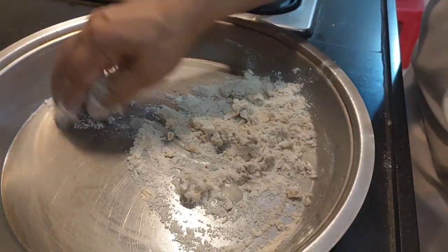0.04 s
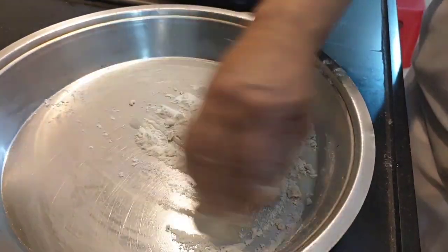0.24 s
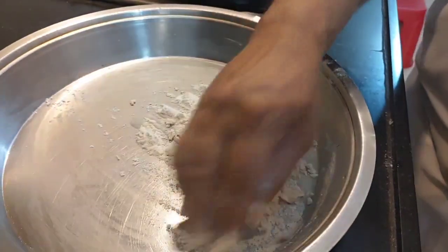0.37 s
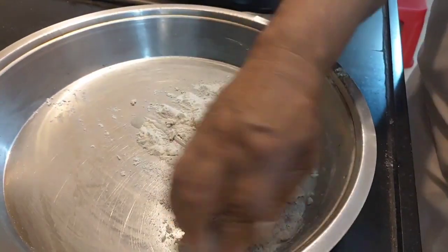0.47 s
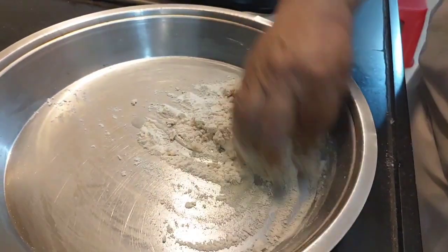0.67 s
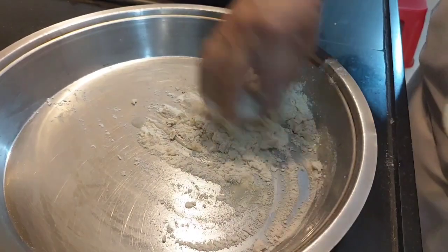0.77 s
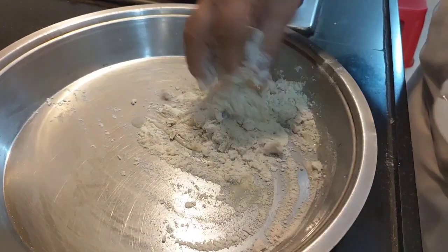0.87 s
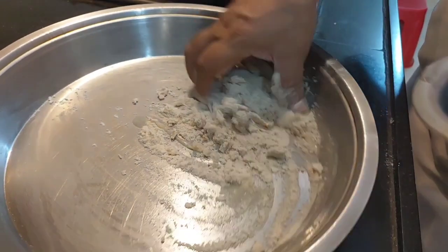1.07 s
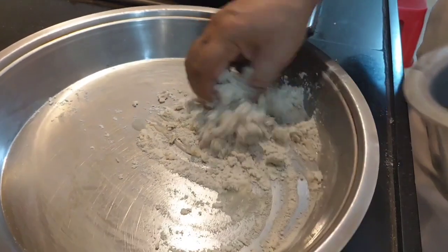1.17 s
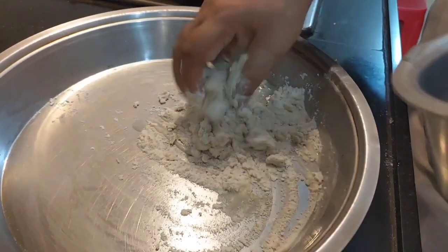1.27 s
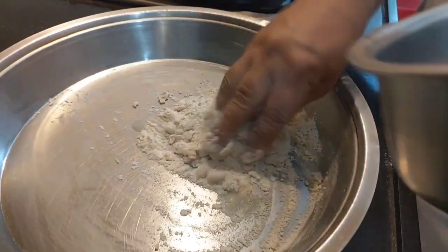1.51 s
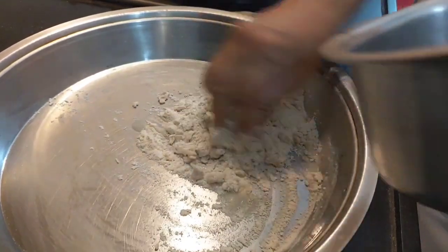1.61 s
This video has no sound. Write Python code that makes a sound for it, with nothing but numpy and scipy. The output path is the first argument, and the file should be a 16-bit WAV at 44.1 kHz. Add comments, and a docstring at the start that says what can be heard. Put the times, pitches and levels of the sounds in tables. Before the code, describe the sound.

Fingers scrape and rub damp flour around a steel plate, ending with a dull clonk.

```python
"""Working flour on a steel plate

Fingers push damp flour around a stainless steel plate: two scratchy sweeps and a lighter third.
Tiny slips of grit make the steel sing faintly, and the palm thuds through the dough.
Near the end the plate rocks with a dull clonk and settles. A small kitchen echoes over a low hum."""
import sys
import numpy as np
from scipy import signal
from scipy.fft import rfft, irfft, next_fast_len
from scipy.io import wavfile
from scipy.ndimage import map_coordinates

SR = 44100
rng = np.random.default_rng(int(sys.argv[2]) if len(sys.argv) > 2 else 0)


def transcribe(signal):
    """Save signal, clipped to [-1, 1], as a 16-bit WAV file at the path in sys.argv[1]."""
    frames = np.atleast_2d(signal).T
    limited = np.clip(frames, -1, 1)
    pcm = np.round(limited * 32767).astype(np.int16)
    wavfile.write(sys.argv[1], SR, pcm)


N = 72765  # 1.65 s

# Tone of the kitchen's steady noise: f/Hz, relative level/dB
ROOM_TONE = [(25, -5.5), (45, -14), (90, 4), (160, 3), (260, -7.5), (400, -23), (600, -22), (1150, -28),
             (1700, -30), (4000, -37.5), (7600, -37), (8400, -52.5)]
# Notes of the hum: f/Hz, level/dB
HUM_NOTES = [(100, -74), (148, -73), (247, -81)]
# The kitchen's echo: f/Hz, fade time/s (the time to drop by 60 dB)
ECHO_FADES = [(150, 0.22), (800, 0.38), (1500, 0.39), (3000, 0.31), (8000, 0.24)]
# The palm presses the dough: t/s, length/s, thud level/dB, plate drone level/dB
PALM_PRESSES = [(-.02, 0.029, -57.5, -81), (.05, 0.044, -63.5, -58), (0.173, 0.11, -55, -70.5),
                (0.288, 0.059, -50.5, -71.5), (0.392, 0.14, -56.5, -88.5), (0.603, 0.071, -61, -53.5),
                (0.702, 0.076, -54.5, -59.5), (0.803, 0.029, -57, -57.5), (0.979, 0.11, -56.5, -64),
                (1.101, 0.11, -56.5, -52.5), (1.209, 0.1, -58.5, -58), (1.339, 0.091, -50, -62),
                (1.431, 0.068, -59.5, -57), (1.616, .04, -59, -76)]
# Tone of a thud: f/Hz, relative level/dB
THUD_TONE = [(40, -17.5), (70, -14), (95, -2), (120, -7.5), (146, 1), (185, -3), (250, -2.5), (310, -12),
             (400, -18.5), (600, -47)]
# The plate sounds briefly as the hand presses it, and at the end as it settles on the counter:
# t/s, length/s, level/dB, f/Hz
PLATE_MURMURS = [(-.02, 0.032, -74, 770), (.0, 0.21, -86, 1180), (0.167, 0.057, -64, 1220),
                 (0.216, 0.029, -52.5, 1192), (0.247, 0.034, -59, 950), (0.29, 0.075, -52, 773),
                 (0.341, 0.03, -49.5, 772), (0.311, 0.042, -58, 360), (0.383, 0.15, -63, 827),
                 (0.662, 0.14, -65.5, 436), (0.794, 0.031, -68, 440), (0.946, 0.096, -77, 1097),
                 (0.957, 0.22, -68.5, 424), (1.262, 0.01, -63, 713), (1.256, 0.047, -66.5, 1340),
                 (1.359, 0.044, -56, 488), (1.369, 0.016, -54.5, 1240), (1.457, 0.0062, -70, 1780)]
# Low notes of the whole plate: f/Hz, relative level/dB, fade time/s
LOW_NOTES = [(190.3, -8.5, 0.33), (241.4, -1.5, 0.19), (423.5, 4, 0.16), (476, -8.5, 0.19),
             (752, 1.5, 0.12), (792, -0.5, 0.22), (1053, -15, 0.25), (1245, -7, 0.2), (1358, -17.5, 0.26),
             (1425, -14.5, .14), (1561, -17, 0.11), (1750, -13, 0.12), (1896, -22.5, .18),
             (2379, -25, 0.11)]
# The plate meets the counter: t/s, relative level/dB, rise time/s, centre f/Hz, spread/octaves
COUNTER_KNOCKS = [(1.3363, -38.5, 0.00047, 1835, 0.37), (1.336, -41.5, 0.0033, 226, 0.42),
                  (1.340, -35.5, 0.0079, 810, .4), (1.374, -41, .016, 485, 0.14)]
# Tone of flour grit scratching steel: f/Hz, relative level/dB
SCRATCH_TONE = [(2000, -42), (3300, -20.5), (3900, -4), (4400, -4.5), (5050, 3), (5750, -1.5), (6300, -5.5),
                (7000, -4.5), (7600, -1.5), (8000, -16.5), (8450, -30.5)]
# Duller tone of skin rubbing steel: f/Hz, relative level/dB
RUB_TONE = [(400, -29), (650, -14.5), (900, -13.5), (1150, 2), (1500, 2), (2150, 5.5), (2600, 2),
            (3200, -4.5), (4500, -18.5)]
# Bright notes of the plate, set off by the grit: f/Hz, relative level/dB, fade time/s
BRIGHT_NOTES = [(1120, -10, .25), (2104, -8, .25), (2907, 1, 0.49), (3760, -8, .45), (4090, -2, .5),
                (4737, -7.5, 0.24), (4880, -3.5, .36), (4953, -3.5, 0.13), (5060, -14.5, .33),
                (5020, -8, 0.11), (5395, -15.5, 0.17), (6730, -4, 0.46), (7340, -5, .33), (7530, -8, .35)]
# Finger strokes: t/s, length/s, scratch level/dB, rub level/dB, boost to the steel's ringing/dB
FINGER_STROKES = [(0.156, 0.038, -57, -68, 0), (0.207, .016, -51.5, -53, 13.5),
                  (0.222, 0.025, -41.5, -52, 3), (0.253, 0.075, -40, -53.5, -19.5),
                  (0.273, 0.01, -31, -49.5, -9), (0.299, 0.031, -29.5, -43.5, -8.5),
                  (0.332, 0.0025, -37, -41, 13.5), (0.343, 0.015, -29, -39.5, 3),
                  (0.365, 0.076, -49, -54, 11), (0.439, 0.037, -37, -51.5, -2.5),
                  (0.469, 0.02, -58, -50.5, 12), (0.511, 0.049, -67.5, -62, -5),
                  (0.565, 0.039, -64.5, -64, -6), (0.62, 0.072, -61.5, -63.5, 10),
                  (0.659, .01, -49.5, -55, 11), (0.669, 0.03, -42.5, -55, -1.5),
                  (0.704, 0.016, -44.5, -69.5, -4.5), (0.722, 0.058, -43, -55.5, -20.5),
                  (0.78, 0.012, -65, -58.5, -18), (0.814, 0.042, -50, -57, -0.5),
                  (0.869, 0.023, -66, -67.5, 1), (0.937, 0.052, -71, -79.5, 3.5),
                  (1.195, 0.048, -60, -74, 12.5), (1.225, 0.026, -48.5, -65, -9.5),
                  (1.248, 0.077, -53.5, -62.5, -8), (1.332, .04, -59.5, -62, -9),
                  (1.37, 0.013, -56.5, -67, -3)]


def amp(db):
    """Turns decibels into a gain."""
    return 10 ** (np.asarray(db) / 20)


def unit(x):
    """Scales a sound to an average power of 1."""
    return x / np.sqrt(np.mean(x ** 2) + 1e-20)


def along(points, hz):
    """Reads between the rows of a (frequency, value) table, evenly in pitch."""
    f, values = np.transpose(points)
    return np.interp(np.log(hz + 1), np.log(f + 1), values)


def filtered(x, gain_at):
    """Turns each frequency up or down by gain_at(hz)."""
    size = next_fast_len(N + SR // 2)
    return irfft(rfft(x, size) * gain_at(np.fft.rfftfreq(size, 1 / SR)), size)[:N]


def coloured(x, tone):
    """Shapes a sound with a tone table, at an average power of 1."""
    return unit(filtered(x, lambda hz: amp(along(tone, hz))))


def wobble(per_s):
    """A smooth curve through per_s random values a second."""
    return map_coordinates(rng.standard_normal(4096), [np.arange(N) * per_s / SR], mode="wrap")


def wavering(hz, t, radians, per_s):
    """A pure note that drifts a little ahead and behind."""
    return np.sin(2 * np.pi * hz * t + radians * wobble(per_s))


def envelope(starts, lengths, levels_db, attack_s, release_s):
    """Loudness over time: each move rises, holds and dies away; overlaps add in power."""
    t = np.arange(N) / SR - starts[:, None]
    since_end = np.maximum(t - lengths[:, None], 0)
    shape = np.clip(t / attack_s, 0, 1) * np.exp(-since_end / release_s)
    return np.sqrt(np.sum((amp(levels_db)[:, None] * shape) ** 2, axis=0))


def fade(t, fade_s):
    """Dies away by 60 dB every fade_s seconds."""
    return np.exp(-np.log(1000) * t / fade_s)


def background():
    """Low kitchen noise with a faint, slightly unsteady hum."""
    t = np.arange(N) / SR
    hum = sum(amp(db) * np.sqrt(2) * wavering(hz, t, radians=.5, per_s=5.6) for hz, db in HUM_NOTES)
    return hum + amp(-66) * coloured(rng.standard_normal(N), ROOM_TONE)


def kitchen_echo(x, level_db):
    """The room answers a sound; each frequency dies at its own speed."""
    hz, t, spectrum = signal.stft(rng.standard_normal(SR // 2), SR, nperseg=256)
    fading = fade(t, along(ECHO_FADES, hz)[:, None])
    _, tail = signal.istft(spectrum * fading, SR, nperseg=256)
    tail = np.pad(tail, (SR // 200, 0))  # arrives 5 ms late
    return amp(level_db) * signal.fftconvolve(x, tail / np.linalg.norm(tail))[:N]


def kneading():
    """The palm thuds through the dough and keeps the plate's lowest note droning."""
    start, length, thud_db, drone_db = np.transpose(PALM_PRESSES)
    level = lambda db: envelope(start, length, db, attack_s=.0089, release_s=.031)
    drone = unit(wavering(144, np.arange(N) / SR, radians=.92, per_s=20))
    thud = coloured(rng.standard_normal(N), THUD_TONE)
    return thud * level(thud_db) + drone * level(drone_db)


def murmuring():
    """The plate sounds briefly around one pitch when pressed, and at the end as it settles."""
    width_octaves = .19
    out = np.zeros(N)
    for start, length, db, hz in PLATE_MURMURS:
        peak = lambda f: 1 / (1 + (np.log2((f + 1) / hz) / width_octaves) ** 2) ** 2
        band = unit(filtered(rng.standard_normal(N), peak))
        out += band * envelope(np.array([start]), np.array([length]), [db], attack_s=.011, release_s=.014)
    return out


def rocking():
    """The plate tips against the counter and settles; each knock rings some of its low notes."""
    out = np.zeros(N)
    for start, knock_db, rise_s, centre_hz, octaves in COUNTER_KNOCKS:
        t = np.maximum(np.arange(N) / SR - start, 0)
        rise = 1 - np.exp(-t / rise_s)
        punch = amp(9.5) * fade(t, fade_s=.057)  # a loud start that dies quickly
        for hz, note_db, fade_s in LOW_NOTES:
            share = np.exp(-.5 * (np.log2(hz / centre_hz) / octaves) ** 2)
            note = wavering(hz, t, radians=.61, per_s=30)  # loose dough keeps shifting the note
            out += share * amp(knock_db + note_db) * rise * (fade(t, fade_s) + punch) * note
    return out


def grit():
    """Tiny slips of flour under the fingers: random sizes, caught and let go in clumps."""
    slips_per_s, scatter_db, clump_db = 7700, 1.5, .5
    slips = (rng.random(N) < slips_per_s / SR) * rng.choice([-1, 1], N)
    sizes = amp(scatter_db * rng.standard_normal(N))
    return slips * sizes * amp(clump_db * wobble(per_s=110))


def scraping():
    """Each stroke drags grit and skin over the steel, which sings on in its bright notes."""
    start, length, scratch_db, rub_db, ring_db = np.transpose(FINGER_STROKES)
    scratch, rub = coloured(grit(), SCRATCH_TONE), coloured(grit(), RUB_TONE)
    level = lambda db: envelope(start, length, db, attack_s=.0078, release_s=.012)
    push = scratch * level(scratch_db + ring_db) + rub * level(rub_db + ring_db)
    t = np.arange(SR) / SR
    ring = sum(amp(db) * fade(t, fade_s) * np.sin(2 * np.pi * hz * t) for hz, db, fade_s in BRIGHT_NOTES)
    singing = signal.fftconvolve(push, ring / np.linalg.norm(ring))[:N]  # every slip starts a ring
    return scratch * level(scratch_db) + rub * level(rub_db) + amp(-19.5) * singing


def scene():
    """Hand and plate heard close up in the kitchen, in one channel."""
    mixing = scraping() + kneading() + murmuring()
    clonk = rocking()
    echo = kitchen_echo(mixing, level_db=-6.5) + kitchen_echo(clonk, level_db=-9)
    return (mixing + clonk + echo + background())[None]


def record(dry):
    """Cuts away the highest treble steeply."""
    top_hz = 8380
    low_pass = signal.ellip(12, .1, 90, top_hz, fs=SR, output="sos")
    return signal.sosfilt(low_pass, dry)


dry = scene()
out = record(dry)
transcribe(out)
```